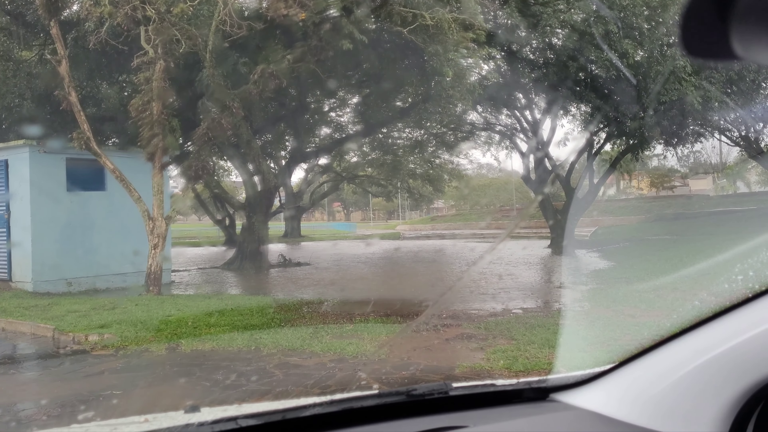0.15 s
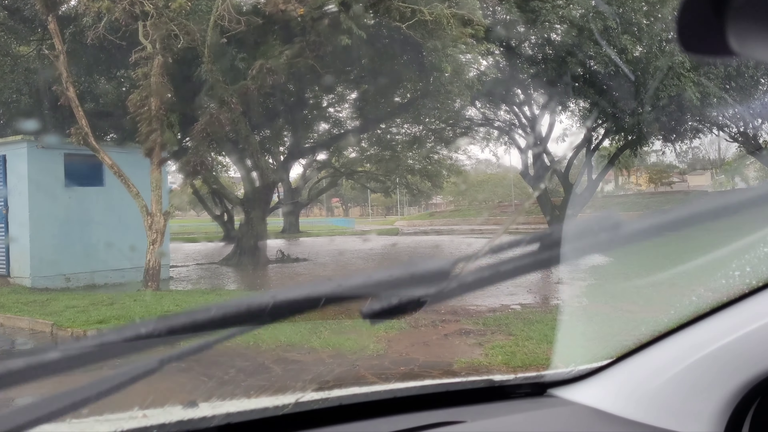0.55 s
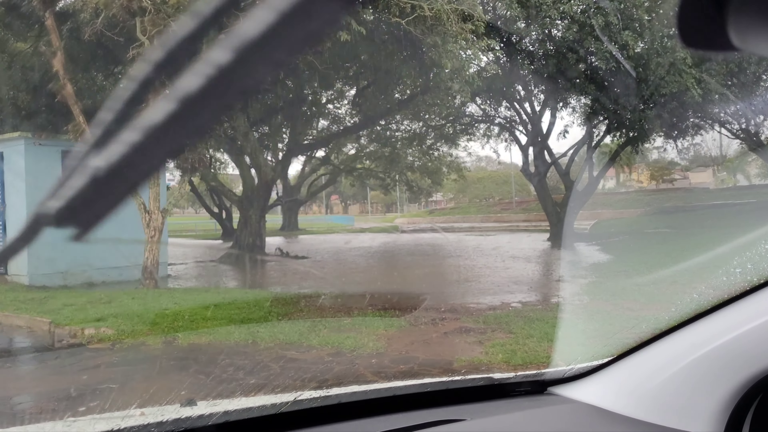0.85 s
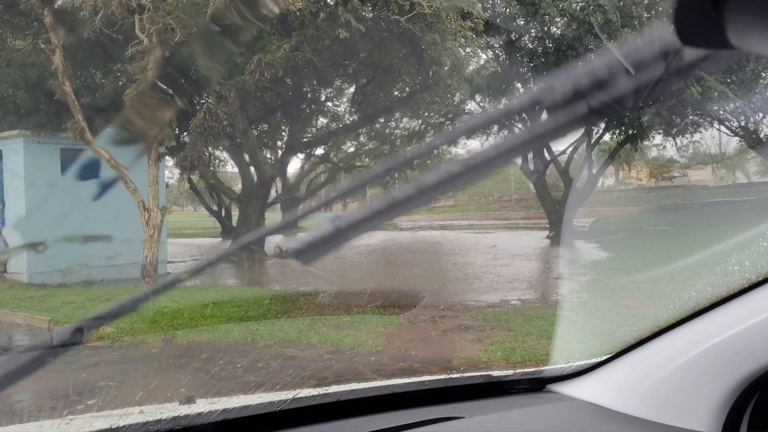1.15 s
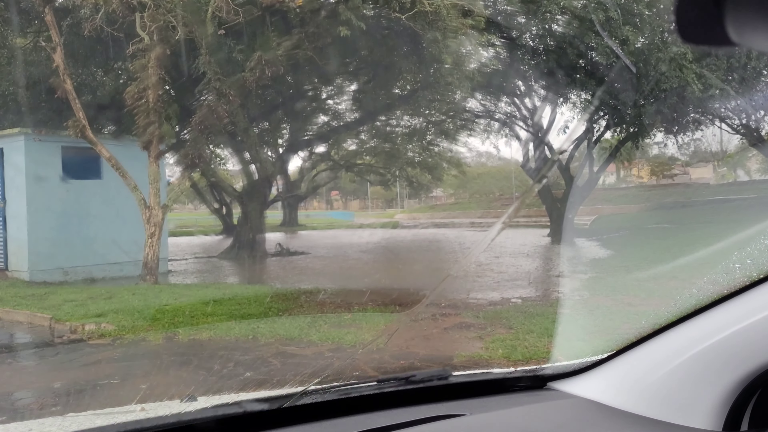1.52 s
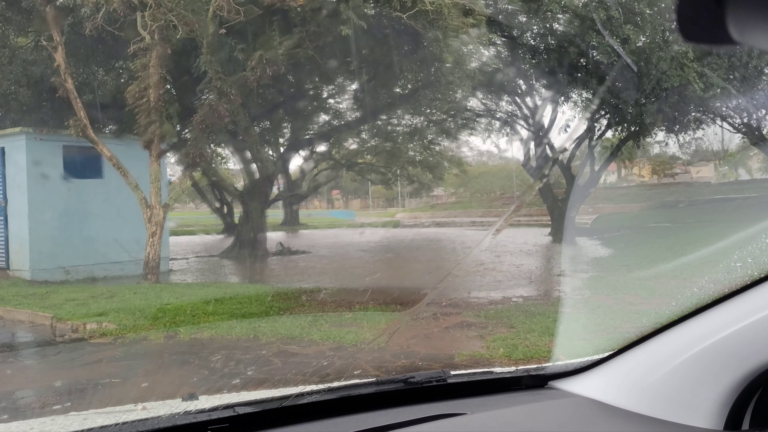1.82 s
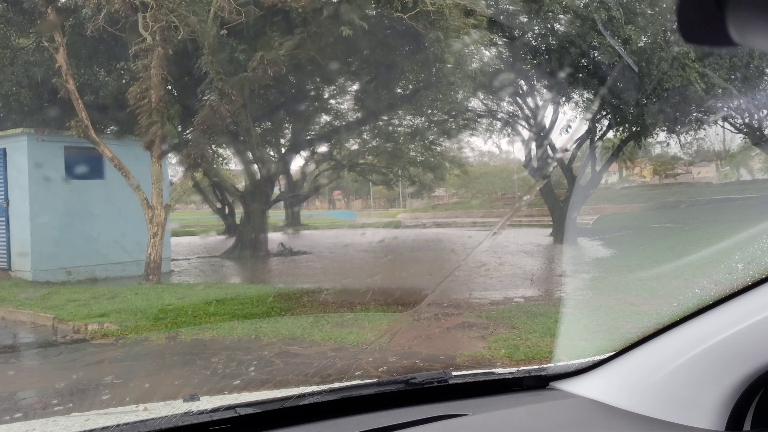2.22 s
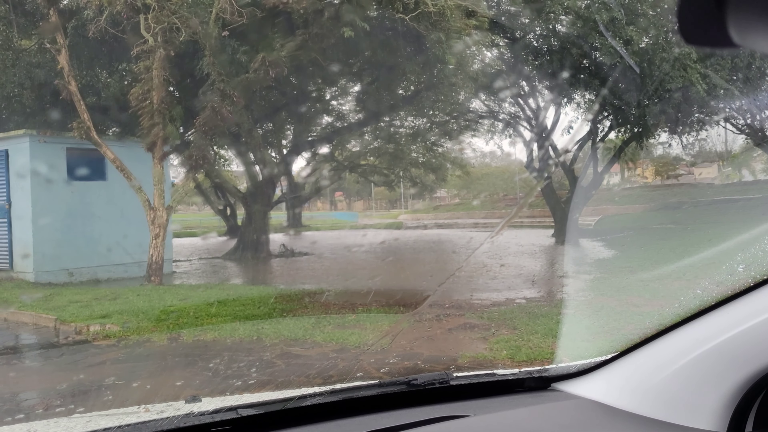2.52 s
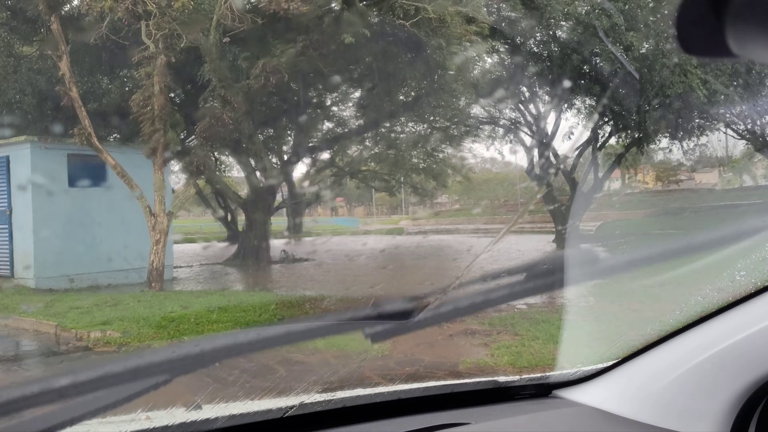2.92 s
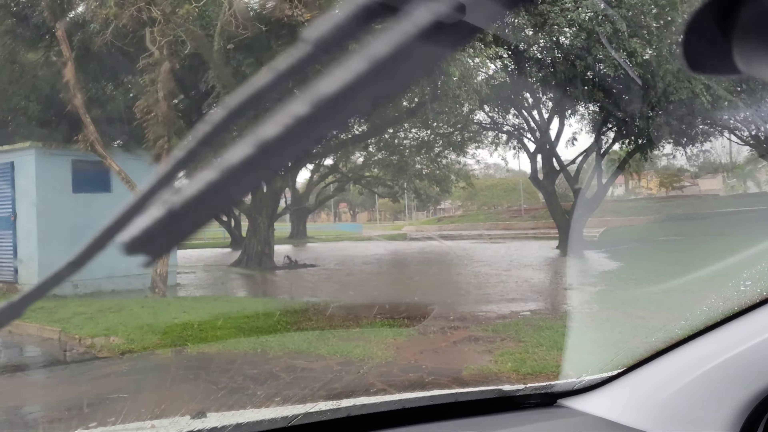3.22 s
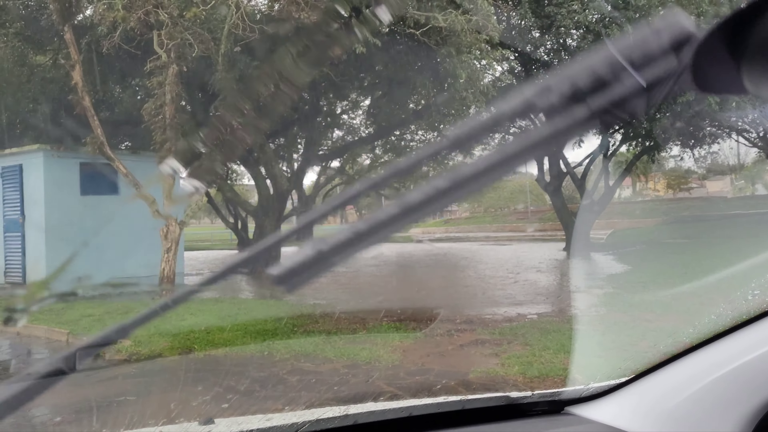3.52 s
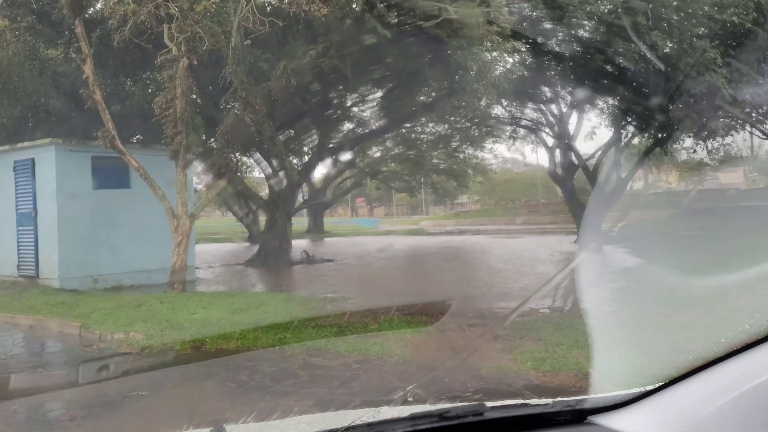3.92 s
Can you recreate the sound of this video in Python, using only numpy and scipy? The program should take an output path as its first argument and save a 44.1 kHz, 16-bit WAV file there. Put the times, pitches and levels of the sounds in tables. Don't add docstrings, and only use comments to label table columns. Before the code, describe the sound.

Muffled cabin sound picked up by a stereo handheld microphone: low engine hum, dense pattering rain and irregular heavy drops. After a brief wait the wiper thumps into motion, whirs, knocks as it reverses, hisses wetly down and clunks to rest. Rain and engine continue alone for about a second, then the stroke repeats, ending with bright spray on the right and a tiny rubber squeak on the left.

```python
import sys
import numpy as np
from scipy import signal
from scipy.fft import rfft, irfft
from scipy.io import wavfile

SR = 44100
rng = np.random.default_rng(int(sys.argv[2]) if len(sys.argv) > 2 else 0)


def nominal_scale(level):
    x = np.asarray(level, float) / 20
    return 10 ** x


def to_wav(sig):
    pcm = np.clip(np.atleast_2d(sig), -1, 1) * 32767
    pcm = np.round(pcm).astype(np.int16)
    wavfile.write(sys.argv[1], SR, pcm.T)


N = 178823
RIGHT_LAG_SAMPLES = 20


def rms_one(x):
    return x / np.sqrt(np.mean(x ** 2) + 1e-20)


def in_time(rows):
    s, *columns = np.transpose(rows)
    return [np.interp(np.arange(N) / SR, s, c) for c in columns]


def at_hz(points, hz):
    point_hz, value = np.array(points).T
    return np.interp(np.log(hz), np.log(point_hz), value)


def drift(rate_hz):
    r = np.exp(-80 * np.pi * rate_hz / SR)
    noise = rng.standard_normal(N // 40 + 2002)
    slow = signal.lfilter([1], [1, -2 * r, r * r], noise)[2000:]
    return np.interp(np.arange(N) / 40, np.arange(len(slow)), rms_one(slow))


def tone(hz, level_db, wobble, rough_db):
    phase = 2 * np.pi * np.cumsum(hz) / SR + wobble * drift(12)
    return np.sqrt(2) * nominal_scale(level_db + rough_db * drift(29)) * np.sin(phase)


def ring(clicks, hz, t60_s):
    r = 10 ** (-3 / (max(t60_s, 1e-4) * SR))
    w = 2 * np.pi * hz / SR
    return signal.lfilter([0, np.sin(w)], [1, -2 * r * np.cos(w), r * r], clicks + 1e-18)


def clicks_at(rows, level_db):
    out = np.zeros(N)
    np.add.at(out, (np.array(rows)[:, 0] * SR).astype(int), nominal_scale(level_db))
    return out


def fade(clicks, t60_s, rise_s=0.0011):
    r = 10 ** (-3 / (max(t60_s, 1e-4) * SR))
    q = np.exp(-1 / (rise_s * SR))
    fall = signal.lfilter([1], [1, -r], clicks + 1e-18)
    return signal.lfilter([1 - q], [1, -q], fall)


def place(x, pan_db, lag=0):
    late = np.pad(x, (lag, 0), "edge")[:N]
    return np.array([x * nominal_scale(pan_db / 2), late * nominal_scale(-pan_db / 2)])


def band_pass(x, low_hz, high_hz, order):
    return signal.sosfilt(signal.butter(order, [low_hz, high_hz], "band", fs=SR, output="sos"), x)


def noise_band(low_hz, high_hz, order):
    return rms_one(band_pass(rng.standard_normal((2, N)), low_hz, high_hz, order))


# (f/Hz, correlation)
LIKENESS = [(60, .95), (130, .9), (290, .7), (640, .25), (1400, -.05), (15000, 0)]
# (f/Hz, L-R level/dB)
LEANING = [(60, -16), (99, -0.5), (160, 4), (270, 0), (450, -2), (740, 1.5), (1220, 2.5), (2010, -3),
           (3330, 6.5), (5500, 0), (9080, 0.5), (15000, 1.5)]


def bands(source, spectrum, low_hz, patchy_db, shared):
    edges = np.geomspace(low_hz, 16500, int(3 * np.log2(16500 / low_hz)))
    out, together = 0, drift(22)
    for k, (low, high) in enumerate(zip(edges, edges[1:])):
        hz = np.sqrt(low * high)
        if hz > spectrum[-1][0]:
            break
        pair = band_pass(source[k % len(source)], low, high, 2)
        alike = np.clip(at_hz(LIKENESS, hz), -1, 1)
        own = np.sqrt(1 - alike)
        common = (np.sqrt(1 + alike) - own) / 2
        gain = nominal_scale(at_hz(spectrum, hz) + patchy_db * (shared * together + drift(20)))
        lean = nominal_scale(at_hz(LEANING, hz) / 2 * np.array([[1], [-1]]))
        out = out + gain * lean * (own * pair + common * pair.sum(axis=0))
    return out / np.std(out.mean(axis=0))


def running(rows):
    t = np.arange(N) / SR
    return np.clip(np.minimum(t - rows[0][0], rows[-1][0] - t) / .05 + .5, 0, 1)


# (t/s, thud level/dB, frame level/dB, glass level/dB)
MOMENTS = [
    (.365, 0.1, -2.5, -2.4),
    (1.043, -2.2, -2.2, -0.8),
    (1.606, 0, -2.6, -0.6),
    (2.765, 1.2, -1, -0.3),
    (3.439, -4, -2.4, -0.2),
    (4.002, 6, -3.8, -1.7),
]


def sweeps(rows):
    return [[(s + start[0], *rest) for s, *rest in rows] for start in MOMENTS[::3]]


def contacts(tables, extra):
    rows, kinds = [], []
    for k, moment in enumerate(MOMENTS):
        for row in tables[k % 3]:
            rows.append(np.array(row) + np.array(moment)[extra])
            kinds.append(k % 3)
    return np.array(rows), np.array(kinds)


# (t/s, f/Hz, level/dB)
THIRD = [(0, 82.75, -37), (.7, 83.1, -40), (1.4, 83.45, -41), (2, 83.29, -37.5), (2.7, 82.92, -41),
         (3.3, 82.16, -40), (4.05, 81.4, -44)]
# (multiple of shaft speed, level/dB)
UPPER_ORDERS = [(1, -58), (4, -46.5), (5, -52.5), (6, -57), (8, -67.5)]
# (t/s after start, f/Hz, level/dB)
HUM = [(-.15, 113.8, -43), (-.06, 109.5, -45), (.16, 120.6, -32.5), (.29, 123.8, -40), (.39, 113.4, -53),
       (.73, 111.1, -36.5), (1.03, 110.4, -50.5), (1.5, 111.2, -45)]
# (t/s, level/dB)
SWELL = [(0, -31), (.3, -31), (.42, -22), (.6, -26.5), (.82, -33.5), (.95, -27), (1.24, -27), (1.4, -32),
         (1.66, -25), (1.95, -31), (2.3, -27.5), (2.65, -32), (2.81, -24), (3.12, -26.5), (3.27, -30),
         (3.51, -26), (3.72, -31), (3.97, -22)]
# (t/s, depth level/dB)
NULLS = [(.33, -3.5), (.535, -6), (.74, -9), (1.07, -22), (1.49, -15), (1.775, -9.5), (2.0, -6),
         (2.33, -13.5), (2.939, -6.5), (3.195, -5.5), (3.33, -3.5), (3.635, -6), (3.775, -18), (4.06, -7)]


def engine():
    third_hz, third_db = in_time(THIRD)
    t = np.arange(N) / SR
    null_s = 0.034
    null_db = sum(depth_db * np.exp(-((t - s) / null_s) ** 2) for s, depth_db in NULLS)
    boom = tone(third_hz * 2 / 3, in_time(SWELL)[0] + null_db, wobble=.1, rough_db=.5)
    third = tone(third_hz, third_db, wobble=.1, rough_db=.8)
    upper = sum(tone(round(k) * third_hz / 3, level_db, wobble=.4, rough_db=2.5)
                for k, level_db in UPPER_ORDERS)
    hum = tone(*in_time(sum(sweeps(HUM), [])), wobble=.3, rough_db=2.5)
    air = ring(ring(rng.standard_normal(N), 46.2, 0.35), 46.0, 0.41)
    low = boom + nominal_scale(-40.5) * rms_one(air)
    lag = 2 * RIGHT_LAG_SAMPLES
    return place(low, -1.9, lag) + place(third + upper + hum, -.2, lag)


# (t/s, patter level/dB)
RAIN = [(0, -60.5), (.5, -61), (1.25, -59.5), (1.6, -59), (1.85, -61.5), (2.3, -60), (3.6, -59),
        (4.05, -57)]
# (f/Hz, level/dB per Hz)
PATTER = [(210, -33), (350, -11.5), (398, 1.5), (445, -11), (498, -3), (707, -1.5), (1020, -8.5),
          (1090, -10), (1760, -8), (3230, -13), (7790, -24.5), (8850, -28.5), (16000, -29)]


def rain():
    patter_db, = in_time(RAIN)
    fine_db = -80.5 + 1.3 * (patter_db - patter_db.mean())
    born = rng.random(N) < 160 / SR
    size_db = 4.3 * np.minimum(rng.exponential(1, N), 2.5)
    port_db = 3.7 * rng.standard_normal((2, N))
    ticks = rms_one(fade(born * nominal_scale(size_db) * nominal_scale(port_db), 0.0047))
    source = rng.standard_normal((2, 2, N)) * (1 + 0.28 * ticks)
    wash = bands(source, PATTER, 350, patchy_db=.7, shared=.9)
    top = signal.sosfilt(signal.butter(4, 8000, "high", fs=SR, output="sos"), wash)
    return nominal_scale(patter_db + 4) * (wash - top) + nominal_scale(fine_db + 9.5) * rms_one(top)


# (t/s, peak level/dB, splash level at 6-14 kHz/dB, L-R level/dB)
DROPS = [(0.0526, -37, -66, -3), (0.127, -47, -73, 5), (0.1665, -35, -68, -3), (0.2345, -39, -61.5, -1),
         (0.4587, -40.5, -66.5, -5), (0.584, -39.5, -71, 0), (0.7143, -37.5, -63.5, 4),
         (0.849, -42, -60, 8), (1.12, -42, -62, 1), (1.237, -43, -62, 1), (1.306, -35.5, -74.5, 3),
         (1.357, -37, -62.5, 1), (1.3868, -36, -59.5, 6), (1.475, -44, -65.5, 6), (1.5094, -54, -58.5, -3),
         (1.7755, -40.5, -66.5, 9), (2.0697, -38, -83, 6), (2.121, -40.5, -72, -2), (2.217, -36, -62.5, 2),
         (2.4105, -39, -66.5, -1), (2.4403, -39.5, -78.5, 6), (2.863, -39.5, -61, 3),
         (2.9816, -43.5, -69, 1.5), (3.038, -38, -72.5, 3), (3.2115, -39.5, -70, 5), (3.3394, -56, -55, 0),
         (3.704, -52, -64, 1), (3.759, -45, -50.5, 16.5), (3.895, -42.5, -65, 10)]


def big_drops():
    s, tap_db, splash_db, pan_db = np.transpose(DROPS)
    taps = np.array([fade(clicks_at(DROPS, tap_db - 13.5 + way * pan_db / 2), 0.054, rise_s=0.00073)
                     for way in (1, -1)])
    splashes = fade(clicks_at(DROPS, splash_db - 5.5), 0.1, rise_s=.0015)
    return noise_band(820, 3940, order=2) * taps + noise_band(6000, 14000, order=2) * splashes


# (t/s, level/dB)
SPRAY = [(3.2, -72.5), (3.33, -78), (3.342, -78), (3.398, -72.5), (3.812, -61.5), (3.982, -58.5),
         (4.05, -64)]
# (f/Hz, level/dB per Hz)
SPRAY_COLOUR = [(3240, -34), (5500, 2.5), (9110, -8), (11800, 0), (13300, 4), (15200, 5), (16000, -3)]


def spray():
    level_db, = in_time([(SPRAY[0][0] - .1, -110)] + SPRAY)
    hiss = bands(rng.standard_normal((2, 2, N)), SPRAY_COLOUR, 5500, patchy_db=.6, shared=.8)
    return nominal_scale(level_db) * hiss * nominal_scale([[-4], [3]])


# (t/s after start, level/dB)
WIPE = [(.72, -79), (1.0, -70), (1.25, -71.5), (1.31, -73)]


def wipe():
    gain = sum(running(rows) * nominal_scale(in_time(rows)[0]) for rows in sweeps(WIPE))
    return noise_band(5000, 15500, order=1) * gain


# (t/s after start, level/dB)
DRIVE = [(-.15, -47.5), (.1, -37), (.42, -51.5), (.685, -27), (.86, -47.5), (1.05, -44), (1.22, -46),
         (1.42, -48)]
# (f/Hz, level/dB per Hz)
RUMBLE = [(85, -24), (105, 2.5), (140, -10.5), (175, -2.5), (230, -7.5), (300, -4.5), (345, -19),
          (440, -25), (900, -42.5)]
# (t/s after start, f/Hz, level/dB)
GEAR = [
    [(.185, 245, -69.5), (.36, 244, -46.5), (.47, 257.5, -52.5), (.535, 272, -44), (.595, 274.9, -31.5)],
    [(.735, 250, -51), (.885, 246, -48.5), (.98, 243.7, -58)],
]
# (t/s after start, f/Hz, level/dB, octave level/dB)
WHINE = [
    [(.3, 334, -54, -67), (.435, 340, -57, -70), (.55, 326.6, -52, -70)],
    [(.745, 348.7, -52, -72), (.905, 336, -53, -66)],
    [(.965, 305, -52, -57), (1.09, 317.4, -44.5, -59.5), (1.21, 312.4, -44.5, -49.5)],
]


def motor():
    rumble_db, = in_time(sum(sweeps(DRIVE), []))
    noise = rng.standard_normal((2, 2, N))
    rumble = nominal_scale(rumble_db) * bands(noise, RUMBLE, 91.2, patchy_db=-1.5, shared=0.54)
    rumble[1] = np.pad(rumble[1], (RIGHT_LAG_SAMPLES, 0))[:N]
    whine = np.zeros(N)
    for part in GEAR:
        for rows in sweeps(part):
            whine += running(rows) * tone(*in_time(rows), wobble=0.64, rough_db=3.5)
    for part in WHINE:
        for rows in sweeps(part):
            hz, level_db, octave_db = in_time(rows)
            pair = tone(hz, level_db, wobble=.4, rough_db=3.5)
            pair = pair + tone(2 * hz, octave_db, wobble=.3, rough_db=1.5)
            whine += running(rows) * pair
    return rumble + place(whine, 1.6, RIGHT_LAG_SAMPLES)


# (t/s, peak level/dB)
SQUEAKS = [
    (4.0408, -47),
    (4.046, -56),
]


def squeaks():
    return place(ring(clicks_at(SQUEAKS, np.array(SQUEAKS)[:, 1]), 6300, 0.0074), 7.3)


# (t/s after moment, peak level/dB, level at 2.2-4.5 kHz/dB)
FLIPS = [
    [(-.02, -48, -54.5), (.0006, -36, -43.5), (.022, -47, -52)],
    [(-.069, -47, -55), (-.033, -44, -64), (-.003, -36.5, -80), (.009, -56, -42), (.024, -44, -54)],
    [(-.047, -42.5, -81), (.0015, -38.5, -64), (.024, -54.5, -75), (.048, -65, -64)],
]


def flips():
    rows, kind = contacts(FLIPS, extra=[0, 3, 3])
    s, dull_db, bright_db = np.transpose(rows)
    dull_crack = fade(clicks_at(rows, dull_db - 7), .015, rise_s=.0002)
    bright_crack = fade(clicks_at(rows, bright_db - 5), .015, rise_s=.0002)
    dull_tail = fade(clicks_at(rows, dull_db - 7.5), 0.099)
    bright_tail = fade(clicks_at(rows, bright_db - 9), 0.079)
    dull = noise_band(1100, 2260, order=2) * (dull_crack + dull_tail)
    return dull + noise_band(2230, 4470, order=4) * (bright_crack + bright_tail)


# (f/Hz, level/dB, t60/s)
FLOOR_PAN = [(95, -13, .12), (110, 0, .2), (128, -8, .12)]
# (f/Hz, level/dB, t60/s)
PILLAR = [(84, 0, .13), (112, -5, .1), (128, -9, .1)]
# (f/Hz, level/dB, t60/s)
SILL = [(116, -4.5, 0.26), (140, -5.5, 0.17)]
# (f/Hz, level/dB, t60/s)
LINKAGE = [(158.3, -7, 0.1), (197, -1.5, 0.17), (227.5, 0.5, 0.069), (243.8, 2.5, 0.042)]
# (f/Hz, level/dB, t60/s)
COWL = [(272, 1.5, 0.04), (297.5, 7, 0.09), (337.7, 2, 0.17), (408, -3, 0.046)]
# (f/Hz, level/dB, t60/s)
GLASS = [(462.6, -2, 0.086), (488, -5, 0.17), (523, -24, 0.18)]
# (f/Hz, level/dB, t60/s)
ARM = [(722, -5.5, 0.27), (763, 3, 0.11), (858, -6.5, 0.25), (907, -2, 0.017)]
# (t/s after moment, thud level/dB, linkage level/dB, cowl level/dB, glass level/dB)
START = [
    (-.049, -57.5, -29.5, -33.5, -47),
    (-.023, -19, -31, -33, -47),
    (0.0, -8.5, -31.5, -28, -33.5),
    (.0105, -12.5, -20, -26.5, -38),
    (.056, -12, -23, -30.5, -50.5),
    (.083, -16, -46, -42, -66),
    (.099, -22.5, -51, -42.5, -70),
    (.151, -22.5, -36, -38.5, -55),
]
# (t/s, then four level/dB)
TURN = [
    (-.108, -23, -59, -38, -80),
    (-.069, -29.5, -22.5, -31.5, -33.5),
    (-.054, -23, -40, -23.5, -46),
    (-.014, -45, -19, -29.5, -39),
    (0.0, -15.5, -18, -28, -33.5),
    (0.0133, -12.5, -15.5, -25, -32.5),
    (.047, -18.5, -24.5, -44.5, -59),
]
# (t/s, then four level/dB)
REST = [
    (-.05, -29, -26, -50, -51),
    (-.03, -41, -20, -33, -72),
    (-.017, -54, -21.5, -54, -44),
    (0.0, -15.5, -16.5, -28.5, -40.5),
    (.024, -21, -30, -23.5, -31),
    (.047, -30, -35, -34, -54),
]


def knocks():
    rows, kind = contacts([START, TURN, REST], extra=[0, 1, 2, 2, 3])
    s, thud_db, linkage_db, cowl_db, glass_db = np.transpose(rows)
    arm_db = -3 + glass_db + 0.56 * (-41 - glass_db)
    pan_thud_db, pillar_db, sill_db = [np.where(kind == k, thud_db, -200) for k in range(3)]
    # (strike dB, modes, ring dB, rattle dB, L-R dB)
    parts = [(pan_thud_db, FLOOR_PAN, -5.5, -28, -.3),
             (pillar_db, PILLAR, -3, -28, -.3),
             (sill_db, SILL, -3, -28, .3),
             (linkage_db, LINKAGE, -4, -23, 1.2),
             (cowl_db, COWL, -4, -19, 1.2),
             (glass_db, GLASS, -1.5, -15, 1.8),
             (arm_db, ARM, -5, -9, 1.8)]
    out = np.zeros((2, N))
    for k, (strike_db, modes, ring_db, rattle_db, pan_db) in enumerate(parts):
        hits = clicks_at(rows, strike_db)
        low_hz, high_hz = .75 * modes[0][0], 1.2 * modes[-1][0]
        push = band_pass(hits + 1e-18, low_hz, high_hz, 3)
        for hz, level_db, t60_s in modes:
            lag = RIGHT_LAG_SAMPLES + 10 - 2 * k + rng.integers(-2, 3) * k
            out += place(nominal_scale(ring_db + level_db) * ring(push, hz, t60_s), pan_db, max(lag, 0))
        scatter = fade(hits, .14, rise_s=.006)
        out += nominal_scale(rattle_db) * noise_band(low_hz, high_hz, order=4) * scatter
    return out


def scene():
    background = engine() + rain() + big_drops() + spray()
    return background + wipe() + motor() + squeaks() + flips() + knocks()


def roll_off(x):
    return signal.sosfilt(signal.butter(12, 16430, fs=SR, output="sos"), x)


def record(dry):
    mirrored = np.concatenate([dry, dry[:, ::-1]], axis=1)
    spectrum = rfft(mirrored)
    spectrum[:, round(15760 * 2 * N / SR):] = 0
    return roll_off(irfft(spectrum)[:, :N])


dry = scene()
out = record(dry)
to_wav(out)
```